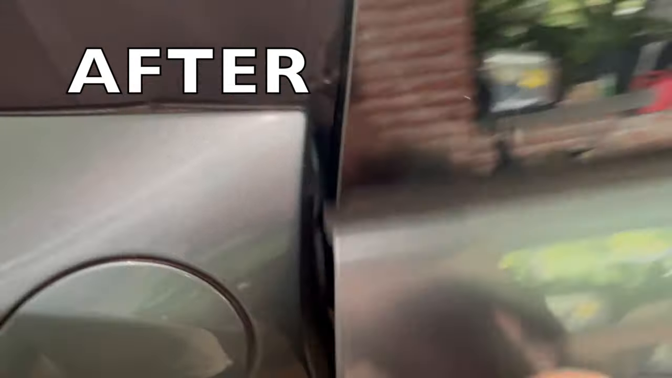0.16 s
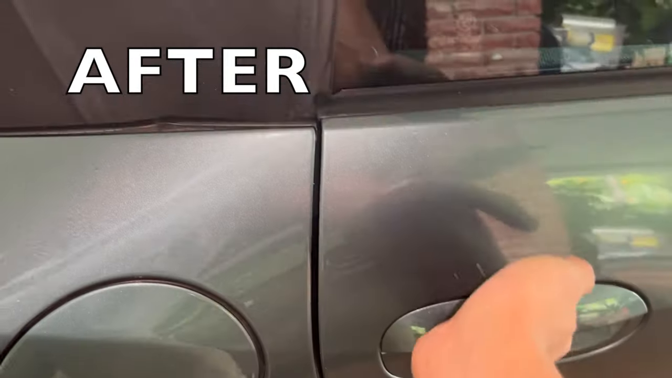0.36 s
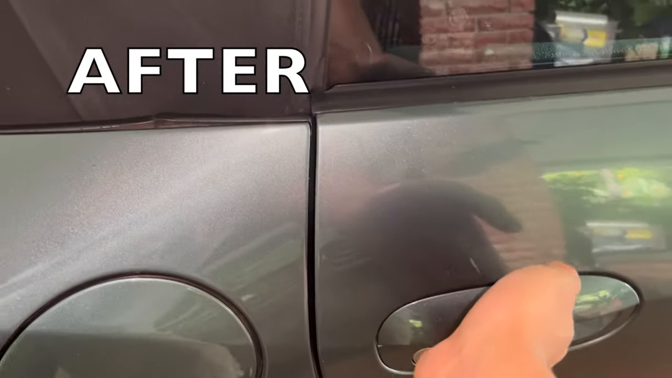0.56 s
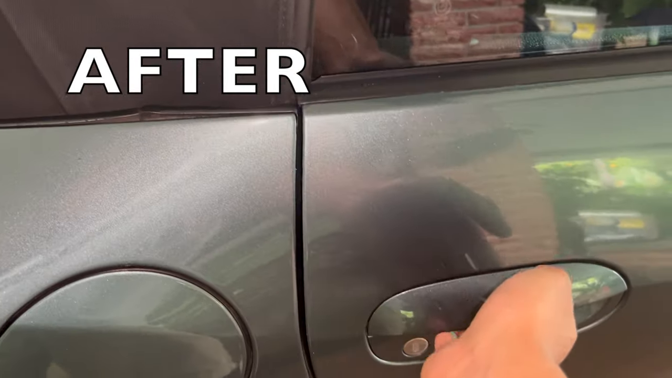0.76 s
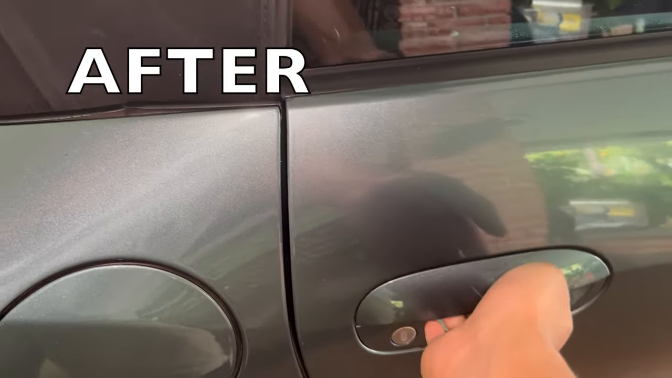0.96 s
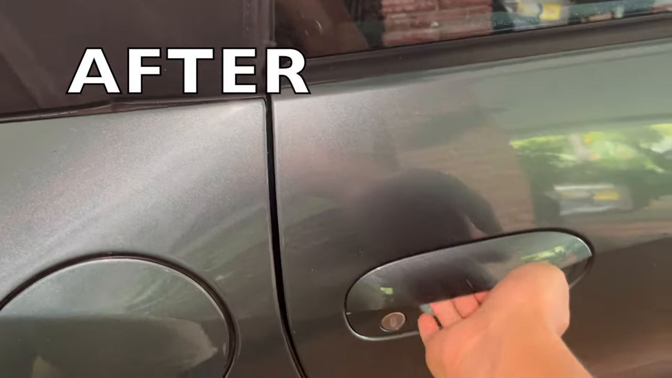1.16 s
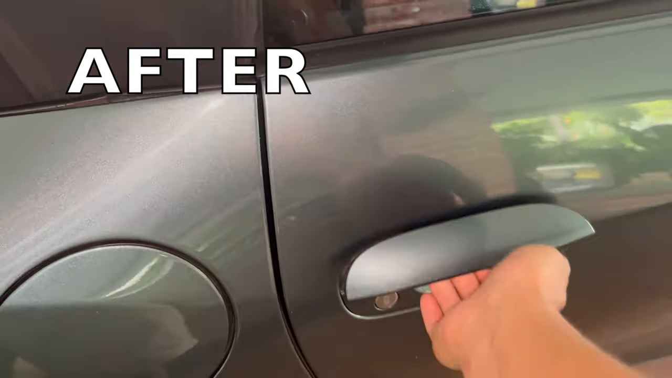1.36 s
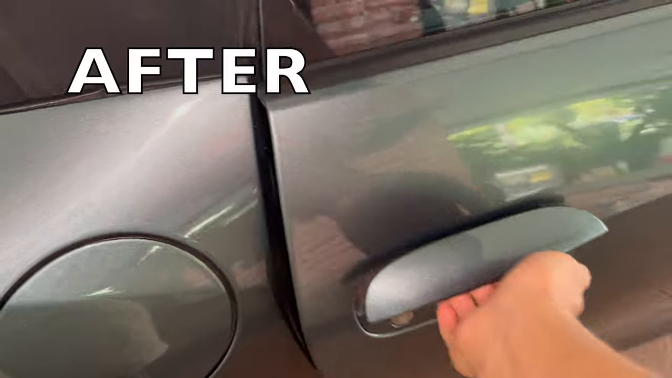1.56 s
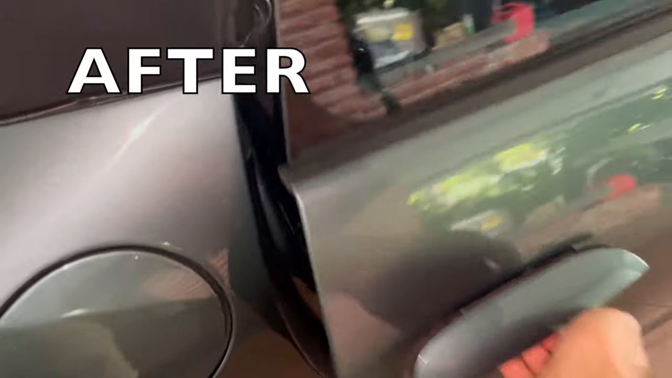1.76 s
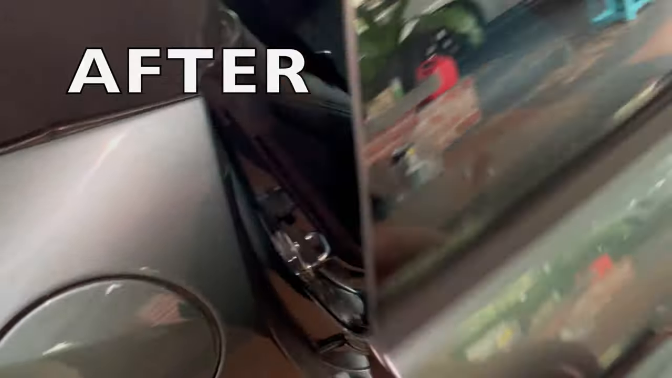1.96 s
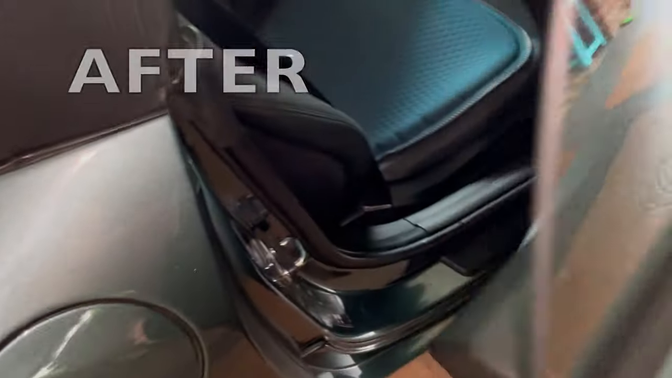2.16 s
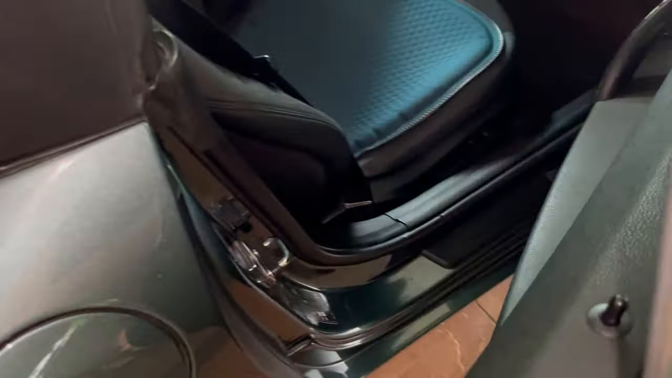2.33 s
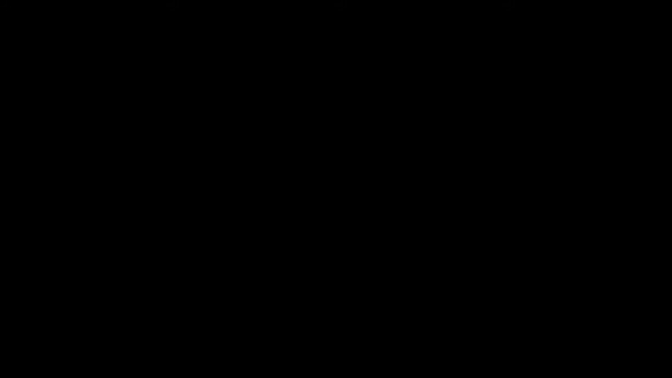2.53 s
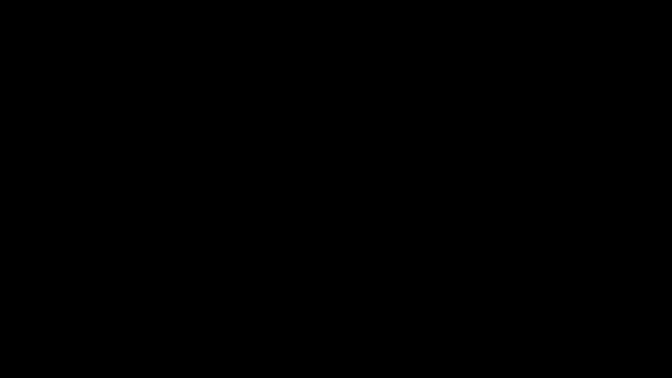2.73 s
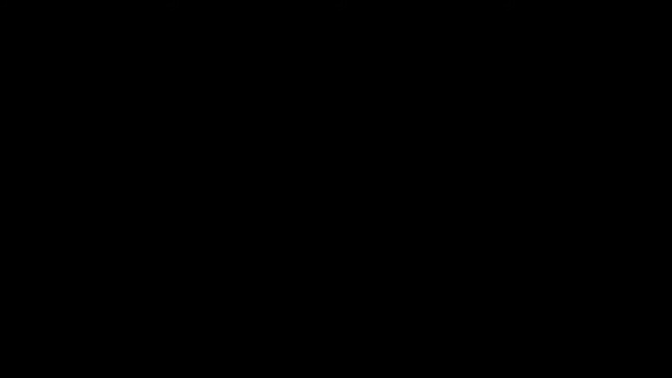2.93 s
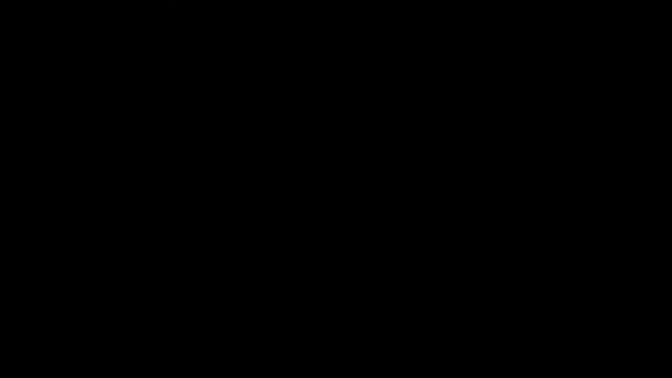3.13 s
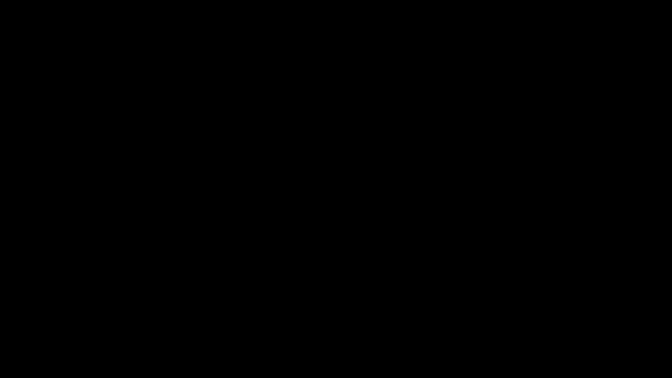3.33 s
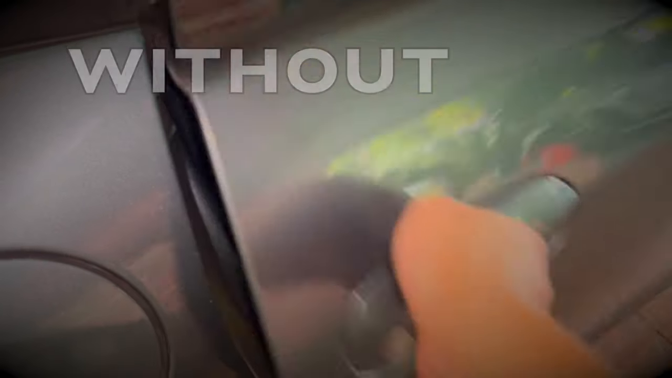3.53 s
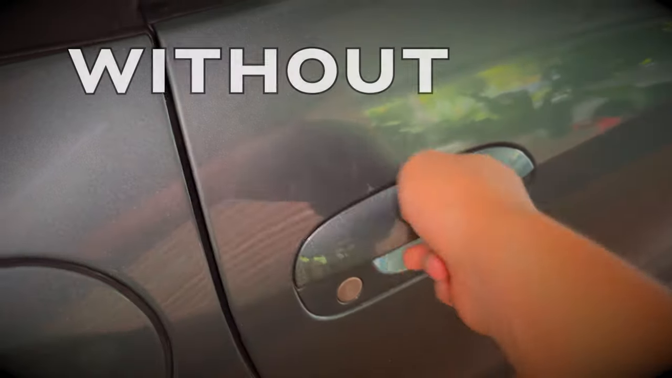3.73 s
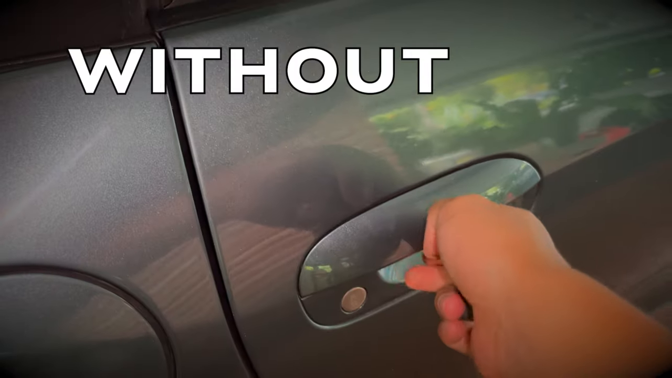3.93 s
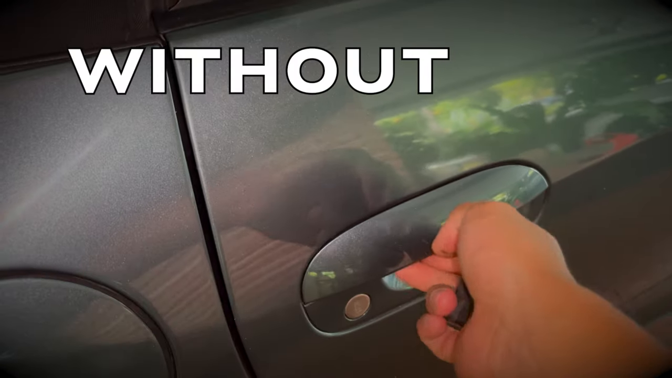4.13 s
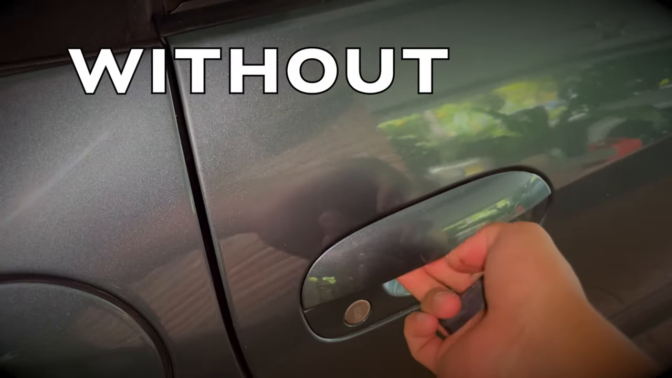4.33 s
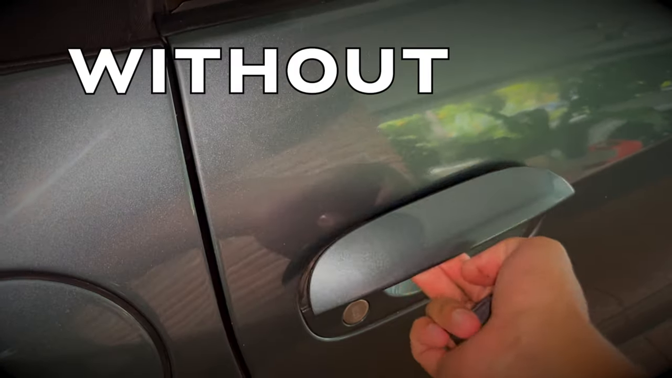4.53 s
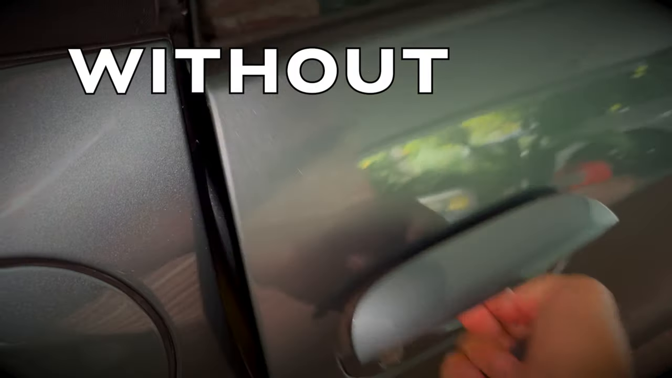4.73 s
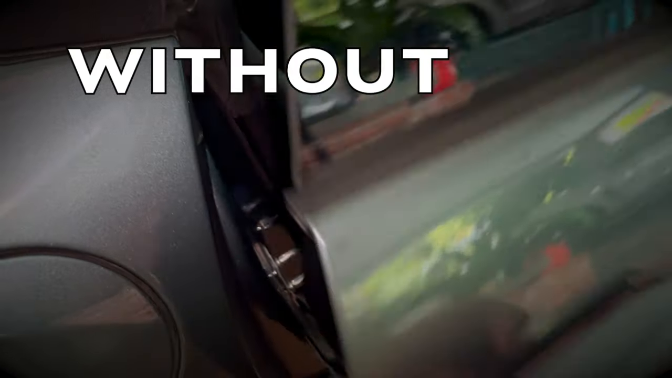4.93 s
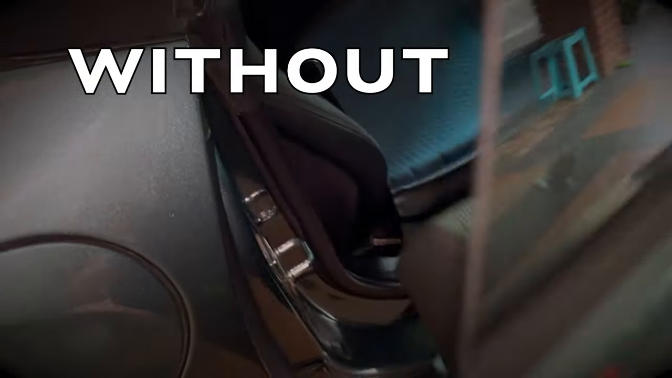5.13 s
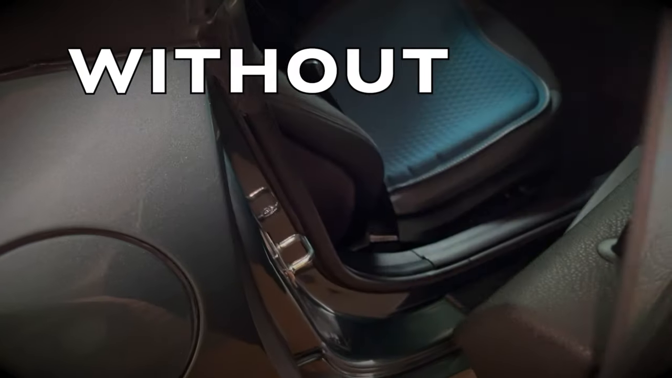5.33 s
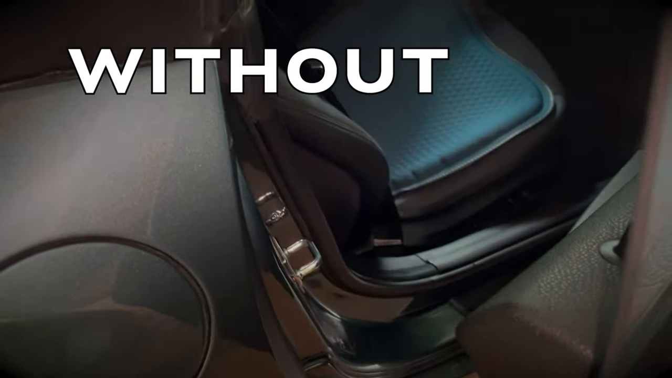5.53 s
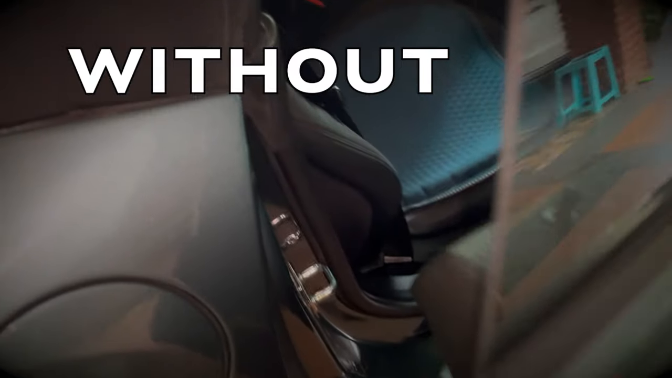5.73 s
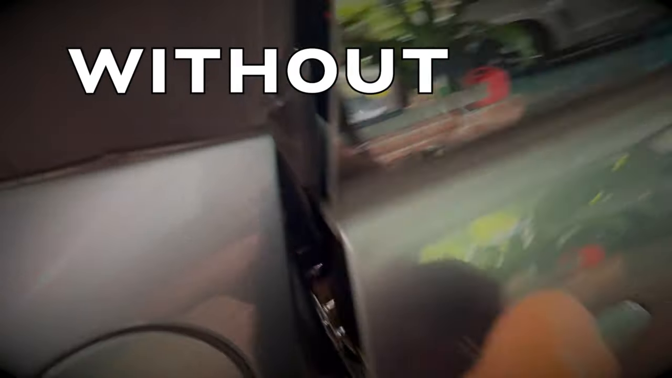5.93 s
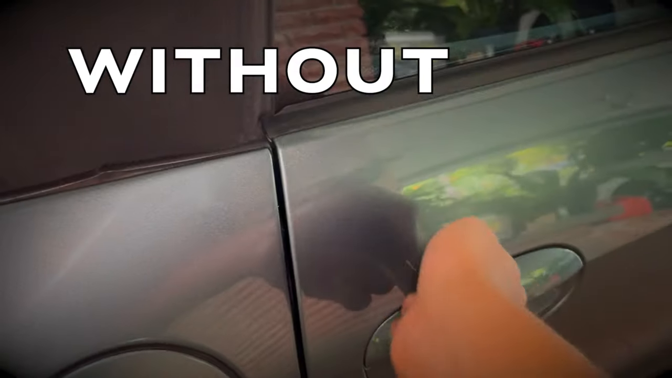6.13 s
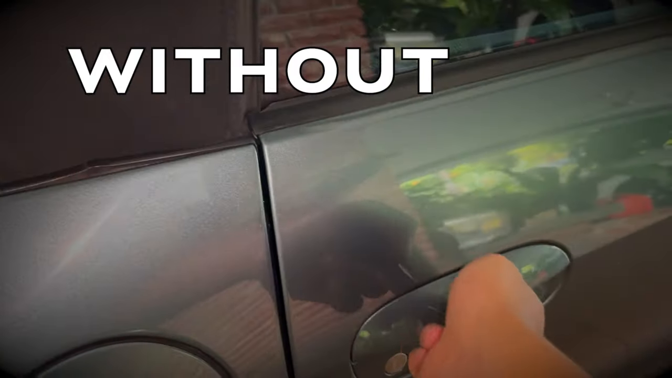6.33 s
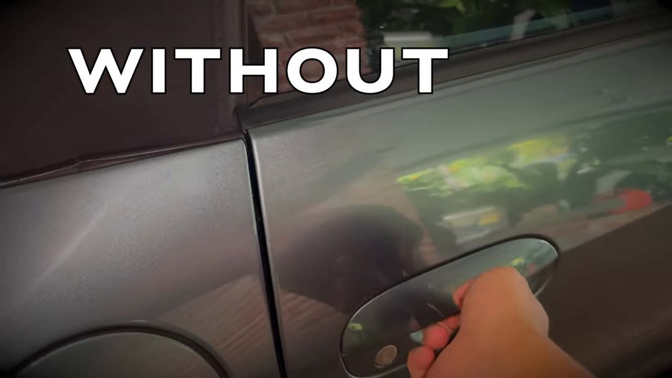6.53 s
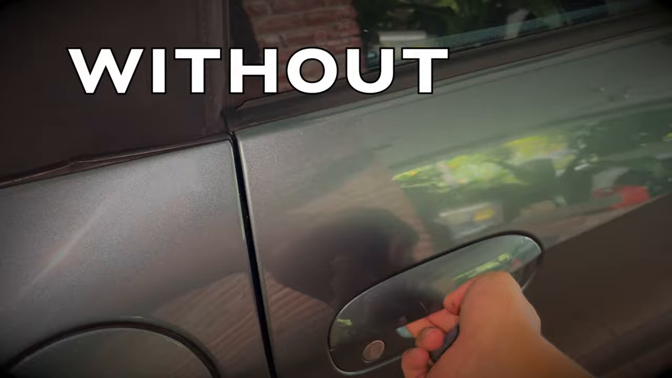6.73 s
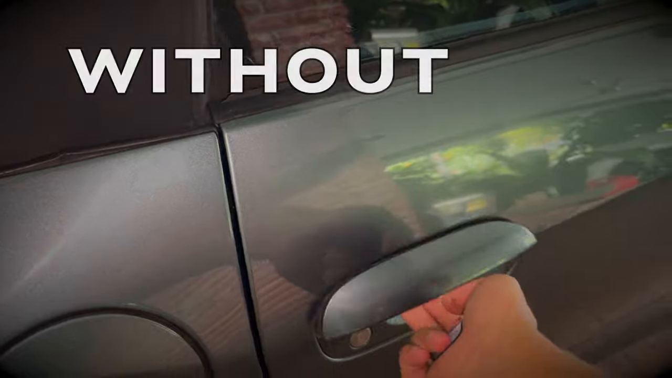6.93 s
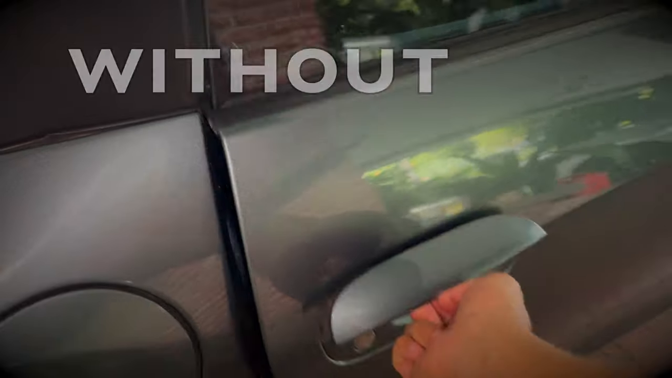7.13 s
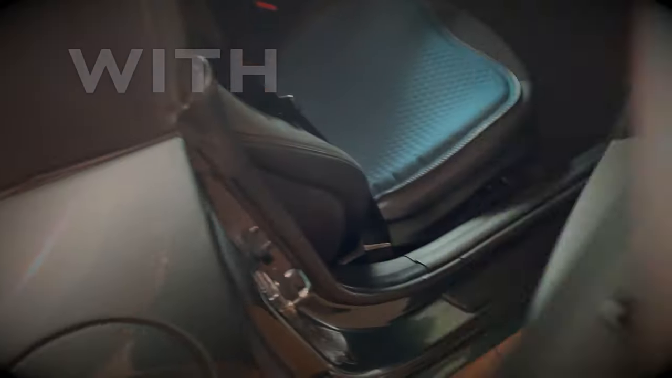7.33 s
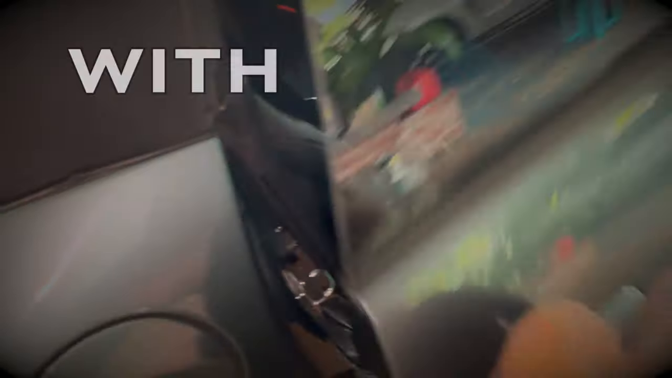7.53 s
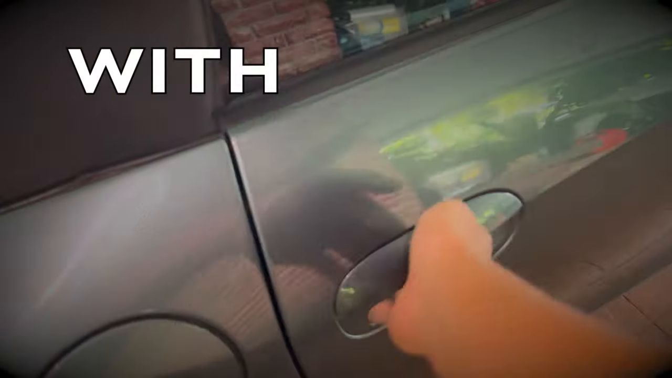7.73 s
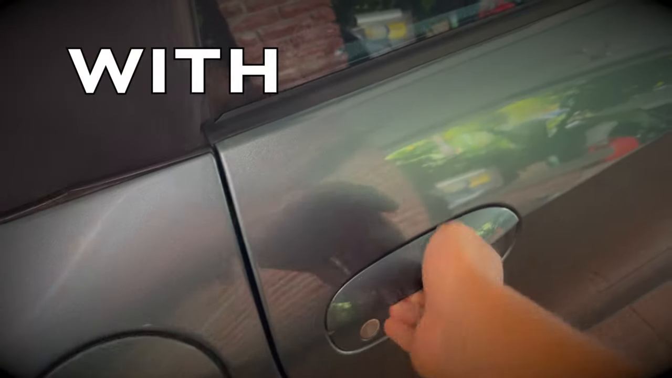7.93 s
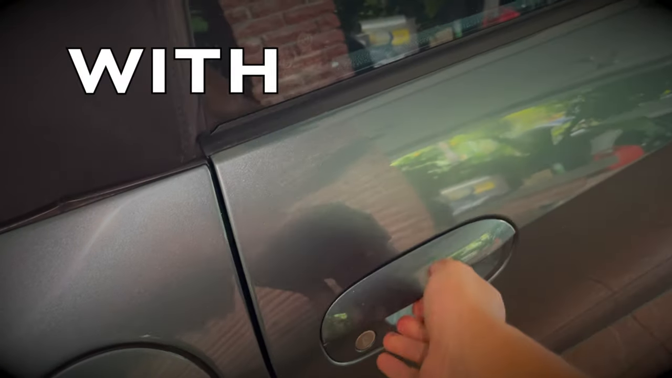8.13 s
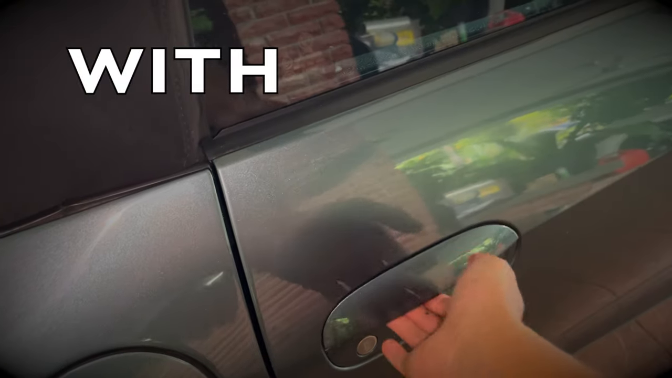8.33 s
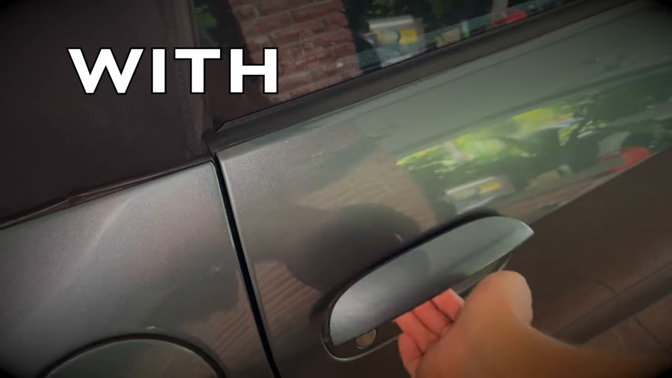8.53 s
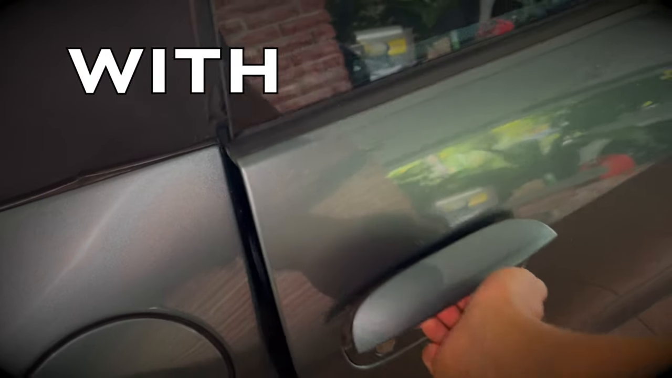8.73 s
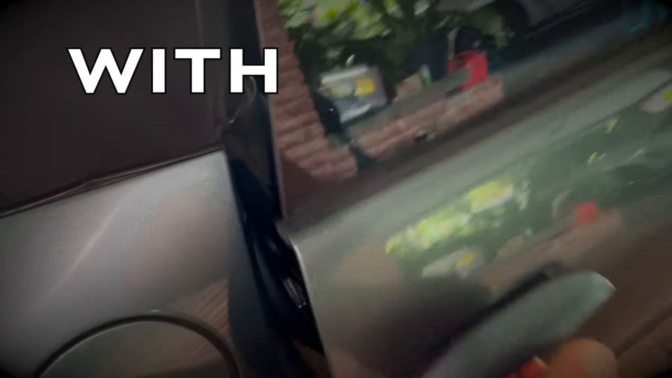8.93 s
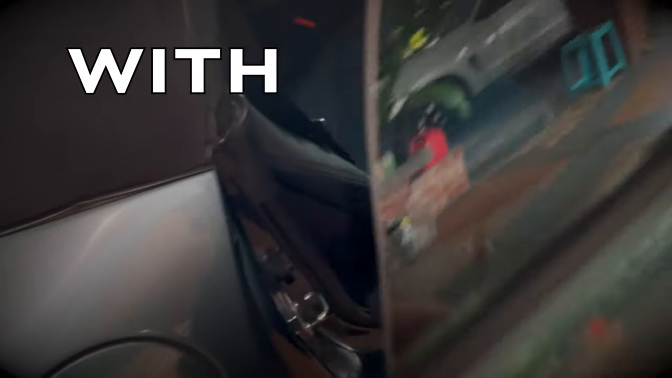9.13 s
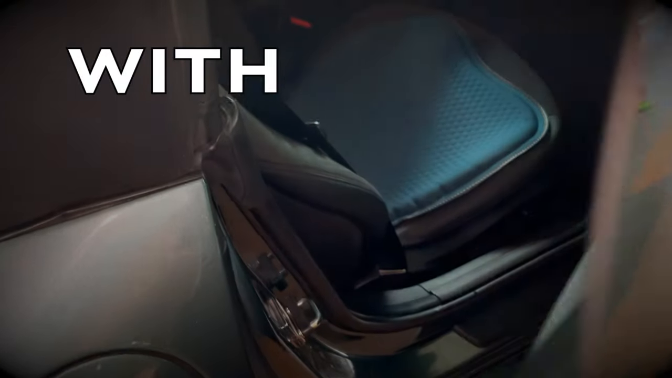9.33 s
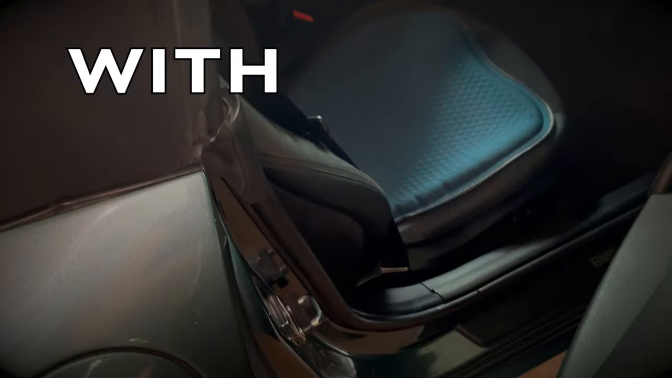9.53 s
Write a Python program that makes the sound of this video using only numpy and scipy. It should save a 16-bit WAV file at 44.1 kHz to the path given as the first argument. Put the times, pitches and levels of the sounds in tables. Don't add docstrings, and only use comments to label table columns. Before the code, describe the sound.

Close phone-microphone sound of a car door under a walled carport. A soft, double-catching slam, a faint lock motor knock, a handle clack, then a sharp latch release and a strap click as it swings open. About a second of total silence follows. Then two harder, boomier slams and a final duller one, each followed by the same unlocking and opening, with short wall echoes and faint distant traffic.

```python
import sys
import numpy as np
from scipy import signal
from scipy.fft import rfft, irfft, next_fast_len
from scipy.io import wavfile
from scipy.ndimage import uniform_filter1d, minimum_filter1d

SR = 44100
rng = np.random.default_rng(int(sys.argv[2]) if len(sys.argv) > 2 else 0)


def magnitude_from_level(level_db):
    exponent = np.asarray(level_db, float) / 20
    return 10 ** exponent


def unload_audio(sound):
    columns = np.transpose(np.atleast_2d(sound))
    steps = np.round(np.clip(columns, -1, 1) * 32767)
    wavfile.write(sys.argv[1], SR, steps.astype(np.int16))


N = 426447

# (frequency [Hz], level [dB], time to fall 60 dB [s])
BODY = [
    [(48, -10.5, 0.16), (61.07, 0, 0.5)],
    [(89.76, -9.5, 0.54), (103.2, -2, 0.29)],
    [(128.8, -0.5, 0.4), (154.7, -3, .5)],
    [(203, -4, 0.53), (247.25, 0, 0.47), (265.9, -1.5, 0.6), (298.6, -9, 0.44)],
]
# (frequency [Hz], level [dB], time to fall 60 dB [s])
PANEL = [(364, 2, 0.27), (422.4, 0.5, 0.092), (501, -0.5, 0.12), (588, -2.5, 0.088), (686, -5.5, 0.083),
         (790.5, -2.5, 0.04), (942, -3, 0.06), (1090, -3.5, 0.13)]
# (frequency [Hz], level [dB], time to fall 60 dB [s])
PLATE = [(1358, -9, 0.065), (1710, -8.5, 0.09), (2066, -8, 0.052), (2590, -6, 0.054), (2810, -10.5, 0.032)]
# (frequency [Hz], level [dB], time to fall 60 dB [s])
SPRING = [(1918, -5.5, 0.067), (3060, 0, .12), (4400, -5, .2), (4900, 0.5, 0.29), (6900, -8.5, .12)]
# (frequency [Hz], density [dB per Hz])
SHEEN = [(6000, -45.5), (10200, -20.5), (11000, -0.5), (13300, -3), (13900, -8.5), (14200, -12),
         (15800, -24), (18000, -60)]
# (frequency [Hz], density [dB per Hz])
CLICK = [(1470, -17), (2500, -11), (4160, -4.5), (4630, -5.5), (5110, -5), (5690, -10), (6920, -8.5),
         (8260, -11), (9800, -15.5), (12700, -46.5), (21600, -120)]
# (frequency [Hz], density [dB per Hz])
CLANK = [(700, -27.5), (1200, 0.5), (2000, -6), (2900, -10), (4200, -36)]
# (frequency [Hz], density [dB per Hz])
KNOCK = [(170, -30), (300, 7), (600, 3), (1050, -3), (2000, -33)]

# (sheen over click [dB], clank over click [dB], knock over click [dB], life [s],
# best excited skin pitch [Hz])
STRIKE = (-28, -0.5, -1.5, 0.12, 799)
CATCH = (-16, -9.5, -3, 0.17, 700)
SEAL = (-5, -11.5, 0.5, 0.0272, 501)
GRIND = (-21, 3, 6, -0.06, 749)
SOFT_STRIKE = (-23, 3, 6.5, 0.12, 849)
SOFT_CATCH = (-19.5, -12.5, -5, 0.1363, 699)
SOFT_SEAL = (-14.5, -12, -10.5, 0.1, 499)
SOFT_GRIND = (-22, 1, 6.5, 0, 600)
SNAP = (0, -8, 11.5, 0.0325, 849)
SCRAPE = (-7, 0, 7, 0.02, 500)
THUD = (-22, -3, 29, 0.0236, 428.5)
TAP = (-17, -2, 2.5, 0.05, 599)
TICK = (-2, -5.5, 6, 0.02, 499)
CLACK = (-18, -7, 8, 0.0727, 398.5)
BUMP = (-18, 0.4, 20, 0.13, 780)
CLUNK = (-28, 1.8, 25.5, 0.05, 560)
FLICK = (-6, -5, 1, 0.15, 800)
WHIRR = (-17, -11, -4.5, 0.42, 499.5)
DETENT = (-12, -7, -0.5, 0.1553, 2500)
SETTLE = (-25, -2, 11, 0.03, 500)
SPARK = (-5, -12, -10, 0.04, 800)
CREAK = (-26.5, -16.5, -11.5, 1.5, 700)
CHINK = (-15, -7, -4, 0.0536, 1200)
TWANG = (-20, 4, 1.5, 0.07, 2798)
HOLLOW = (-28, -10.5, 28.5, 0, 339.5)
RASP = (-20, 2, 7, 0.02, 1000)
RUSTLE = (-13.5, -8.5, 7.5, 0.07, 499)
NOTCH = (-11, -3, 2, 0.38, 800.5)
PING = (-9, -4, 11.5, -0.44, 849.5)
KNUCKLE = (-24, 0, 11.5, 0.0052, 879.5)

# (second group over lowest [dB], third [dB], fourth [dB],
# ring length [factor])
HEAVE = (0.6, -5, -6, 1)
SHOVE = (5, -1.5, 1.5, 0.5)
REBOUND = (-9, -4.5, 0, 1.52)
NUDGE = (7.9, 4, 3.9, 0.3)
SWAY = (2, -1, -10, 0.58)
PAT = (8, -4, 18, .4)
STOP = (17, 18, 24, 0.42)
JOLT = (1.6, 3.5, 5.7, 0.42)
DRUM = (16, 0.5, 13.85, 0.72)
HUM = (-5.5, -14, -18, 0.53)
RAP = (19.1, 6.8, 21, 0.59)

# (delay [s], level [dB], kind)
PADDED_SLAM = ([(0, -22.5, SOFT_STRIKE), (.003, -17, SOFT_STRIKE), (.011, -10.5, SOFT_GRIND),
               (.016, -14, SOFT_GRIND), (.0235, -3, SOFT_CATCH), (.037, -13.5, SOFT_GRIND),
               (.049, -7, SOFT_SEAL)], [(.012, -11, NUDGE), (.031, -3.5, SWAY), (.053, -6.5, SHOVE),
               (.058, -15.5, REBOUND)])
BARE_SLAM = ([(-.012, -50.5, CREAK), (0, -10.5, STRIKE), (.0022, -13, STRIKE), (.011, -16.5, GRIND),
             (.0222, -4, CATCH), (.027, -13, GRIND), (.038, -11, CHINK), (.0498, 0.5, SEAL),
             (.057, -10.5, SEAL)], [(.031, -2, HEAVE), (.052, -3, SHOVE), (.081, -10, REBOUND)])
LOCK_MOTOR = ([(.001, -44.5, CLUNK), (.005, -47, CLUNK), (.014, -61.5, HOLLOW), (.084, -42, RUSTLE),
              (.1, -45, WHIRR), (.121, -44.5, RUSTLE)], [(.005, -42, DRUM), (.12, -20, HUM)])
HANDLE_PULL = ([(0, -31, FLICK), (.008, -26, CLACK)], [(.011, -43, RAP)])
LINKAGE = ([(0, -48, BUMP), (.023, -41, TICK)], [])
LATCH_RELEASE = ([(-.014, -52, CREAK), (0, -11, SNAP), (.004, -20.5, SCRAPE), (.009, -27, TWANG)],
                 [(0.00049, -10, JOLT)])
HANDLE_RETURN = ([(0, -36.5, TAP), (.004, -37.5, CHINK), (.021, -36, TICK)], [])
CHECK_STRAP = ([(0, -30.5, NOTCH), (.015, -13.5, SPARK), (.017, -21.5, DETENT), (.027, -27, SETTLE)],
               [(.016, -42, STOP)])
STRAY_KNOCK = ([(0.00046, -36, KNUCKLE)], [])
SEAL_PEEL = ([(0, -45, THUD), (.005, -45, THUD)], [(0, -34.5, PAT)])
STRAY_TICK = ([(0.00054, -38, CHINK)], [])
SEAL_RASP = ([(0, -37, RASP)], [])
ROD_PING = ([(0, -38, PING)], [])

# (time [s], strength [dB], slowness [factor], dullness [dB], push [dB])
PADDED_SLAMS = [
    (0.2448, 0.85, .99, 1.5, 0.8),
    (7.6845, -1.5, 1.08, 3, -2),
]
BARE_SLAMS = [
    (3.5964, 0.051, 1.075, .1, .1),
    (6.015, 1.5, .97, .1, -1.5),
]
LOCKS = [(0.7752, 0, 1.02, 0.39, 1.5), (4.1181, 2.4, .98, -1.07, 0.62), (6.5267, -1.2, .99, 0.525, -1.9),
         (8.2094, 0.6, 1.03, 0.53, 0.77)]
PULLS = [(1.2234, -4.5, 1.25, -2.5, -10), (4.4104, 0.2, .85, 3.5, 3.5), (6.8777, 0.3, .98, -3, 3.5),
         (8.4453, 2.5, 0.97, 1.5, 3)]
TAKE_UPS = [(1.3055, 1.5, 1.06, -3, -1), (4.4778, -8.5, .98, -0.6, -2.5), (6.9571, -1.5, 0.69, 0, 3.5)]
RELEASES = [(1.4275, -1.4, 1.02, 1.3, -0.13), (4.624, 1.6, .98, .4, -1.1), (7.0668, 1.6, 1.01, .6, -0.26),
            (8.6403, -1.7, 1.1, 0.22, 0.99)]
RETURNS = [(1.6003, 3.8, 1.03, 1.5, 0), (4.791, 0.5, .98, -1.5, 0), (7.227, 0.67, 0.91, -0.26, 0),
           (8.8196, 2.9, .9, 0.051, 0)]
STRAPS = [(2.1006, -4, 1.43, 3, .1), (5.1841, -1.7, 1.08, -1, .1), (9.2916, 1, .78, 2, 5.2)]
STRAYS = [(.1974, -13.5, 1, 9.8, 0), (1.634, 1, 0.97, 5.5, 0), (1.6463, 7, 1, 3.7, 0),
          (1.657, 0, 1, 4.3, 0), (2.0295, -17.5, 1, 8, 0), (4.2719, -8.5, 0.98, 3.3, 0),
          (4.825, -6, 0.97, 8.8, 0), (7.265, -5.5, 0.98, 9.3, 0)]
PEELS = [(1.547, 0.5, 1, 0.4, -0.2), (4.7395, 0.5, 0.94, -0.5, -3.5), (7.179, -1.5, 0.99, 0, 0.5),
         (8.7692, 2, 1, 1, 1)]
RASPS = [(8.837, 0.5, 1, 0.5, 0), (8.8491, 9, 1, 2.7, 0), (8.864, 1, 1, 1.48, 0)]
PINGS = [(1.507, -3.5, 1, .3, 0), (4.704, 5, 1, 0.29, 0), (7.149, 11, 1, .3, 0), (8.72, 0, 1, 0.4, 0)]
TICKS = [(0.1368, -12.5, 1, 0.2, 0), (0.2834, 22, 0.95, 0.1, 0), (.321, 17, 1, 3, 0), (1.437, 12, 1, .3, 0),
         (1.541, -2, 0.98, 2.5, 0), (4.811, -8, 0.95, 1, 0), (5.344, -13, 1, 2.5, 0),
         (6.048, 17, 0.9, 3.5, 0), (6.8324, -22, 1, .3, 0), (7.693, 17, 0.98, -5.5, 0),
         (7.728, 24.5, 1, -6, 0), (7.744, 21, 1, 0.7, 0), (8.651, 13.5, 1, -1.5, 0), (8.772, -2, 1, 2, 0),
         (8.855, 3, 0.98, 0.1, 0), (9.274, -0.5, 0.96, 1, 0)]
STORY = [(PADDED_SLAM, PADDED_SLAMS), (BARE_SLAM, BARE_SLAMS), (LOCK_MOTOR, LOCKS), (HANDLE_PULL, PULLS),
         (LINKAGE, TAKE_UPS), (LATCH_RELEASE, RELEASES), (ROD_PING, PINGS), (SEAL_PEEL, PEELS),
         (HANDLE_RETURN, RETURNS), (CHECK_STRAP, STRAPS), (STRAY_KNOCK, STRAYS), (SEAL_RASP, RASPS),
         (STRAY_TICK, TICKS)]

# (time [s], frequency [Hz], peak [dB], time
# to fall 60 dB [s])
NOTES = [(.246, 1644, -9.5, 0.065), (.247, 2260, -16, 0.039), (.259, 754, -2, 0.052),
         (.268, 4000, -16, 0.024), (.272, 2370, -11, 0.045), (.293, 4320, -16, 0.035),
         (3.599, 855, -8.5, 0.13), (3.623, 935, -3, 0.047), (3.65, 1066, -6, 0.054), (3.66, 197, -11, 0.34),
         (6.017, 1440, -8, 0.072), (6.017, 2400, -10, .04), (6.038, 1190, -20, 0.039),
         (6.066, 7350, 0.5, 0.019), (6.07, 150.2, -12, 0.428), (7.687, 4300, -14, 0.037),
         (7.711, 6100, -5.5, 0.023), (7.727, 4180, -10, 0.052), (.788, 341, -25.5, 0.31),
         (4.132, 346, -25.5, .3), (6.54, 341, -26.5, 0.32), (8.224, 341.6, -25, 0.2),
         (1.428, 7270, -15, 0.027), (4.632, 2970, -13, 0.033), (7.068, 547, -11, 0.085),
         (7.075, 2980, -14.5, 0.04), (8.641, 7320, -16, 0.029), (1.599, 4600, -33, 0.065),
         (1.62, 5100, -38, 0.083), (1.647, 858, -21, 0.035), (4.791, 4250, -37, 0.056),
         (7.229, 4400, -34, .04), (2.101, 2110, -27, 0.056), (2.102, 780, -33, 0.073),
         (2.121, 4610, -20, 0.025), (2.128, 608, -20.5, 0.092), (5.186, 860, -29, 0.065),
         (5.201, 8440, -11.5, 0.018), (5.203, 2595, -24.5, .13), (9.293, 801, -28, 0.066),
         (9.304, 4000, -11, 0.026), (.035, 3600, -51, 0.087), (.157, 2850, -55, .04),
         (3.584, 4900, -40.5, .09), (6.003, 5240, -39, 0.12), (5.201, 11700, -18, .015),
         (6.065, 12180, -15, .03), (7.7, 100.2, -14.5, 0.36), (6.1, 262.2, -9, 0.36),
         (.252, 900, -5.5, 0.055), (.255, 300, -9.5, 0.062), (.33, 254, -14, 0.29),
               (3.598, 394.6, -14, .1), (3.655, 107, -5.5, .2), (3.69, 259.3, -13.5, 0.34),
               (6.016, 920, -12, .07), (6.04, 480, -9.5, 0.11), (6.045, 103, -4.5, .1),
               (6.07, 95, -5, 0.063), (6.1, 93, -5.5, .12), (7.686, 850, -11, 0.045),
               (7.694, 240, -10, 0.15), (7.698, 370, -6, 0.092), (7.77, 205, -9, .15),
               (7.735, 600, -11, .06), (8.851, 880, -23.5, 0.047), (7.742, 105, -6, 0.22),
               (1.4285, 1080, -7, 0.029), (4.625, 1049, -8.5, .03), (1.432, 2300, -18.5, .05),
               (7.069, 2150, -17.5, 0.071), (8.642, 2500, -20, 0.034), (4.627, 2150, -18, 0.079),
               (7.0675, 1050, -9.5, 0.027), (8.6415, 1160, -10, 0.029), (1.548, 416, -18.5, 0.18),
               (4.74, 410, -18.5, 0.084), (7.18, 400, -19, .08), (8.77, 390, -11.5, 0.083),
               (1.603, 349, -25, .06), (4.797, 330, -25, .04), (8.8, 330, -23, .08),
               (4.703, 870, -17.5, 0.041), (2.121, 2800, -24, .015), (.777, 1050, -29.5, .03),
               (3.7, 1200, -23, 0.027), (6.528, 1080, -29, 0.033), (7.4, 1180, -33, .03),
               (4.412, 1600, -24, 0.043), (4.1, 870, -26, 0.047), (3.651, 7600, -10, 0.022),
               (6.037, 6100, -10, .02), (2.127, 325, -19.5, 0.089), (2.15, 680, -21.5, 0.085),
               (5.25, 260, -27.5, .25), (9.304, 12700, -18.5, .012)]
BEATING = [(-2, 0.4), (1, .45), (3, 0.22)]

# (frequency [Hz], time to fall 60 dB [s], level [dB])
CARPORT = [(59, 0.86, 0), (193, 0.64, 0.5), (510, 0.56, -2.5), (1132, 0.68, -8), (3200, 0.65, -9.5),
           (5700, 0.64, -13), (9200, 0.62, -17), (12500, 0.47, -21)]
# (frequency [Hz], left leads by [radians])
LAG = [(35, 0.5), (70, -0.28), (400, 0.85), (1500, -1.5), (3500, -1), (5500, -1.5), (7500, -1),
       (9800, -2.5), (11200, 1.5), (13000, 0.36), (16000, 5)]
# (frequency [Hz], left minus right [dB])
LEAN = [(100, 1), (300, 1.8), (600, -4), (2500, -2), (8000, -0.35)]
# (frequency [Hz], left-right likeness [-1 to 1])
ALIKE = [(35, 0.997), (80, 0.95), (180, 0.94), (550, .4), (1650, -0.1), (5000, .15), (9300, -0.47),
         (13000, 0.046)]
# (frequency [Hz], left minus right [dB])
SIDEWAYS = [(30, 0.25), (60, 1.5), (150, 3), (1200, 2), (3000, 0.1), (9000, -2.5)]

# (time [s], level [dB])
TRAFFIC = [(0, -38.5), (1.2, -40.5), (2.4, -45), (3.46, -40.5), (4.4, -37.5), (5.4, -45.5), (5.9, -41),
           (6.8, -37.5), (7.5, -44), (8.4, -41), (9.67, -44.5)]
# (frequency [Hz], density [dB per Hz])
RUMBLE = [(12, -66.5), (20, -45.5), (36, -15), (60, -8.5), (90, -8.5), (134, -8.5), (211, -13.5),
          (280, -17), (500, -27.5), (650, -61), (1100, -120)]
# (frequency [Hz], density [dB per Hz])
HISS = [(150, -21), (250, -23), (287, -13.5), (479, -16.5), (631, -12), (4370, -30.5), (8670, -41.5),
        (9770, -68), (10600, -42), (12600, -47.5), (15000, -62.5)]
# (frequency [Hz], density [dB per Hz])
AIR = [(8000, -39.5), (10300, -13), (11000, -2), (13300, 1), (14300, -15.5), (16000, -40.5)]
# (time [s], length [s], frequency [Hz], level [dB])
BIRD = [(0.133, 0.017, 2810, -52), (1.73, 0.088, 4400, -61.5), (4.05, .03, 4270, -60),
        (4.135, 0.035, 3200, -57), (4.726, 0.015, 4400, -43), (9.635, .04, 4400, -62)]


def unit(x):
    return x / np.sqrt(np.mean(x ** 2) + 1e-20)


def along(points, hz, axis=1):
    rows = np.transpose(points)
    return np.interp(np.log(hz + 1), np.log(rows[0] + 1), rows[axis])


def filtered(x, response):
    m = next_fast_len(x.shape[-1] + 4096)
    spectrum = rfft(x, m) * response(np.fft.rfftfreq(m, 1 / SR))
    return irfft(spectrum, m)[..., :x.shape[-1]]


def spread(pair, gain):
    def mid_side(hz):
        turn = np.arccos(np.clip(along(ALIKE, hz), -1, 1)) / 2
        return gain(hz) * [np.cos(turn), np.sin(turn)]

    mid, side = filtered(pair, mid_side)
    left_right = np.array([mid + side, mid - side])
    return filtered(left_right, lambda hz: magnitude_from_level(along(SIDEWAYS, hz) * [[.5], [-.5]]))


def add(track, s, sound):
    track[round(s * SR):][:len(sound)] += sound


def dying(t, t60):
    return np.exp(-np.log(1000) * t / t60)


def ring(modes, t, luck, rise, loose):
    hz, db, t60 = np.transpose(modes)[:, :, None]
    strength, detune = luck[:2 * len(modes)].reshape(2, -1, 1)
    tones = np.sin(2 * np.pi * hz * (1 + loose * detune) * t)
    y = np.sum(magnitude_from_level(db + 2.5 * strength) * dying(t, t60) * tones, axis=0)
    y = y * (1 - np.exp(-t / rise))
    return y / np.max(np.abs(y))


def touches():
    return [(s + delay * slow, db + step_db, sheen_db, clank_db, knock_db + dull_db, life, skin_hz)
            for (steps, _), rows in STORY
            for s, db, slow, dull_db, _ in rows
            for delay, step_db, (sheen_db, clank_db, knock_db, life, skin_hz) in steps]


def pushes():
    return [(s + delay * slow, push_db + step_db, *share)
            for (_, steps), rows in STORY
            for s, _, slow, _, push_db in rows
            for delay, step_db, share in steps]


def contact_grit(rows, parts, t):
    white = rfft(rng.standard_normal((len(rows), 4, len(t))))
    colour = unit(uniform_filter1d(rng.standard_normal(white.shape), size=80))
    skin_hz = np.minimum([row[-1] for row in rows], 900)[:, None]
    octaves = np.log2((np.fft.rfftfreq(len(t), 1 / SR) + 1) / skin_hz)
    white[:, -1] *= magnitude_from_level(-np.minimum(1 * octaves ** 2, 30))
    white = irfft(white * magnitude_from_level(1.5 * colour), len(t))
    layers = [unit(filtered(white[:, k], lambda hz: magnitude_from_level(along(part, hz)))) for k, part in enumerate(parts)]
    return np.stack(layers, axis=1)


def skin_modes(skin_hz, knock_db, life):
    loss_db = 3 + 0.39 * max(knock_db, 0)
    length = max(life, .005) / 0.044
    return [(hz, level - loss_db * np.log2(hz / skin_hz) ** 2, t60 * length)
            for hz, level, t60 in PANEL + PLATE]


def contacts():
    rows = touches()
    parts = (SHEEN, CLICK, CLANK, KNOCK)
    out, blows = np.zeros(N + SR), np.zeros((4, N))
    t = np.arange(SR // 8) / SR
    grit = contact_grit(rows, parts, t)
    luck = rng.standard_normal((len(rows), 38))
    fade = np.cos(np.pi / 2 * t / t[-1])
    for (s, db, sheen_db, clank_db, knock_db, life, skin_hz), noise, lot in zip(rows, grit, luck):
        gains = magnitude_from_level(db + np.array([sheen_db + 2, -4, clank_db + 0.5, 0.94 * knock_db - 4.5]))
        lives = max(life, .005) * np.array([[.22], [.4], [1.2], [1.6]])
        rise = 0.00032 * magnitude_from_level(0.33 * knock_db)
        skin = skin_modes(skin_hz, knock_db, life)
        add(out, s, gains @ (noise * dying(t, lives)) * (1 - np.exp(-t / rise)))
        add(out, s, magnitude_from_level(db + knock_db - 3) * ring(skin, t, lot, rise, loose=0.014) * fade)
        add(out, s, magnitude_from_level(db - 25.5) * ring(SPRING, t, lot[26:], rise=.0005, loose=0.079) * fade)
        burst = np.sqrt(lives[:, 0] * SR / 14)
        blows[:, round(s * SR)] = gains * magnitude_from_level([-1, 0.88, -0.24, -2.0]) * burst

    def even(part, hz):
        density = along(part, hz)
        return magnitude_from_level(density) / np.sqrt(np.mean(magnitude_from_level(2 * density)))

    heard = sum(filtered(blow, lambda hz: even(part, hz)) for blow, part in zip(blows, parts))
    return out[:N], heard


def booms():
    out, t = np.zeros(N + SR), np.arange(SR // 2) / SR
    rows = pushes()
    luck = rng.standard_normal((len(rows), len(BODY), 8))
    for (s, db, *above_db, length), lots in zip(rows, luck):
        for group, more_db, lot in zip(BODY, [0] + above_db, lots):
            modes = [(hz, level, t60 * max(length, .1)) for hz, level, t60 in group]
            add(out, s, magnitude_from_level(db + more_db - 1.5) * ring(modes, t, lot, rise=0.0063, loose=.012))
    return out[:N]


def notes():
    out = np.zeros(N + SR)
    for s, hz, db, t60 in NOTES:
        t = np.arange(round(min(t60, .5) * SR)) / SR
        cluster = sum(share * np.sin(2 * np.pi * (hz + beats / t60) * t) for beats, share in BEATING)
        add(out, s, magnitude_from_level(db - 60 * t / t60) * (1 - np.exp(-t / 0.00056)) * cluster)
    return out[:N]


def carport(x):
    out, step = np.zeros((2, N + 2 * SR)), SR // 2
    build_s = 0.01

    def echo_gain(hz):
        dead_band_db = -30 * np.exp(-((hz - 9750) / 620) ** 6)
        top_loss_db = np.clip((hz - 14200) / 30, 0, 40)
        return magnitude_from_level(along(CARPORT, hz, axis=2) + dead_band_db - top_loss_db)

    for k in range(0, N, step):
        hz, t, z = signal.stft(rng.standard_normal((2, 3 * SR // 4)), SR, nperseg=256)
        t60 = along(CARPORT, hz)[:, None]
        patches = unit(uniform_filter1d(rng.standard_normal(z.shape[1:]), size=16))
        z = z * magnitude_from_level(2.6 * patches)
        z = z * (1 - np.exp(-t / build_s)) * dying(t, t60) / np.sqrt(t60 * SR / 14)
        tail = spread(signal.istft(z, SR, nperseg=256)[1], echo_gain)
        wet = signal.fftconvolve(x[None, k:k + step], tail, axes=1)
        start = k + 300
        out[:, start:start + wet.shape[1]] += wet
    return out[:, :N]


def bird():
    out = np.zeros(N + SR)
    for s, length, hz, db in BIRD:
        t = np.arange(round(length * SR)) / SR
        whistle = np.sin(2 * np.pi * hz * t * (1 - 0.093 * t))
        add(out, s, magnitude_from_level(db) * np.sin(np.pi * t / length) * whistle)
    return out[:N] * magnitude_from_level([[1.5], [-1.5]])


def rush(spectrum, patchy_db):
    z = signal.stft(rng.standard_normal((2, N)), nperseg=512)[2]
    field = uniform_filter1d(rng.standard_normal(z.shape[1:]), size=5, axis=0)
    field = uniform_filter1d(field, size=12, axis=1)
    pair = signal.istft(z * magnitude_from_level(patchy_db * unit(field)), nperseg=512)[1][:, :N]
    return unit(spread(pair, lambda hz: magnitude_from_level(along(spectrum, hz))))


def traffic():
    s, db = np.transpose(TRAFFIC)
    strength_db = np.interp(np.arange(N) / SR, s, db)
    leaves_db = -51 + .4 * (strength_db - strength_db.mean())
    road = magnitude_from_level(strength_db) * rush(RUMBLE, patchy_db=2.0)
    leaves = magnitude_from_level(leaves_db) * rush(HISS, patchy_db=1.0)
    air = rush(AIR, patchy_db=0.2)
    return road + leaves + magnitude_from_level(-85.0) * (air[0] + 0.26 * air)


def scene():
    metal, blows = contacts()
    body, song = booms(), notes()

    def ports(hz):
        level = magnitude_from_level(along(LEAN, hz) * [[.5], [-.5]])
        return level * np.exp(.5j * along(LAG, hz) * [[1], [-1]])

    direct = filtered(metal + body + song, ports)
    echo = carport(magnitude_from_level(1.0) * blows + magnitude_from_level(-8.5) * body + magnitude_from_level(-3.0) * song)
    t = np.arange(N) / SR
    hush_s = 7.335
    present = np.clip(np.maximum(hush_s - t, t - hush_s - .25) / 0.004, 0, 1)
    return (direct + echo) * present + traffic() + bird()


def roll_off(x):
    return signal.sosfilt(signal.butter(12, 16100, fs=SR, output="sos"), x)


def record(dry):
    def tone_balance(hz):
        bass_cut = (1j * hz / (30 + 1j * hz)) ** 2
        return bass_cut * magnitude_from_level(-9 * np.exp(-((hz - 9800) / 600) ** 2))

    x = filtered(dry, tone_balance)
    need = np.minimum(1, 1.3 / (np.max(np.abs(x), axis=0) + 1e-9))
    x = x * uniform_filter1d(minimum_filter1d(need, size=90), size=60)
    t = np.arange(N) / SR
    gap_start_s, gap_end_s = 2.396, 3.464
    x = x * np.clip(np.maximum(gap_start_s - t, t - gap_end_s) / 0.0068, 0, 1)
    return roll_off(x)


dry = scene()
out = record(dry)
unload_audio(out)
```